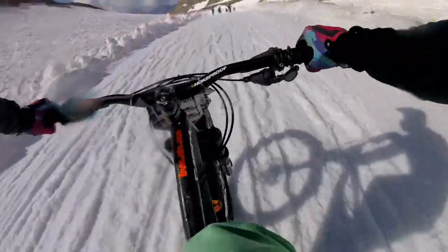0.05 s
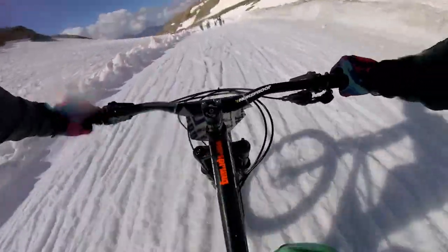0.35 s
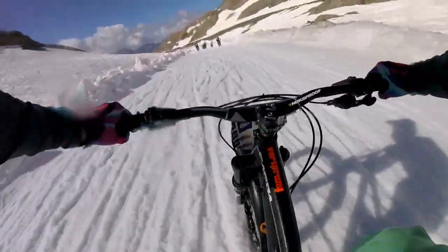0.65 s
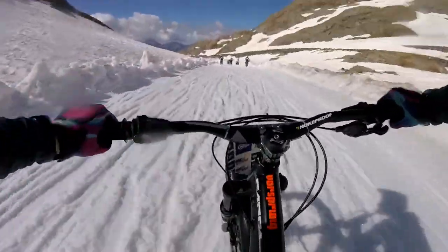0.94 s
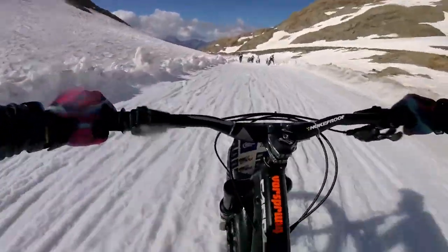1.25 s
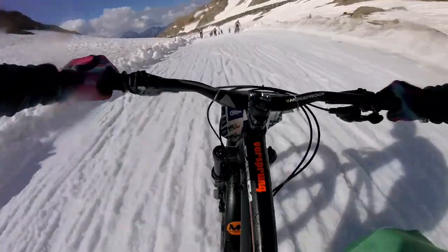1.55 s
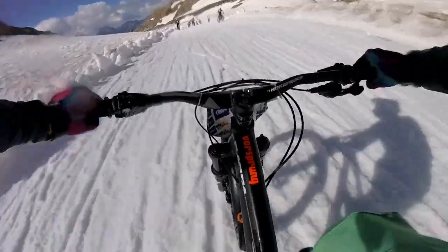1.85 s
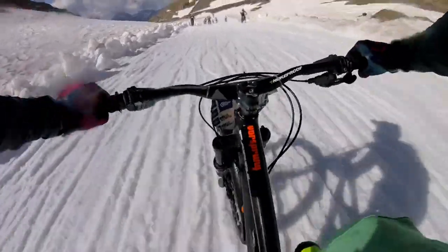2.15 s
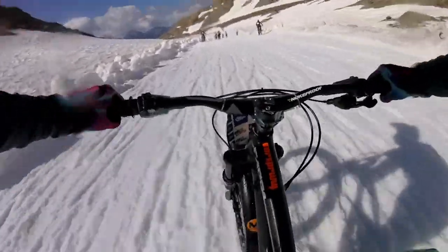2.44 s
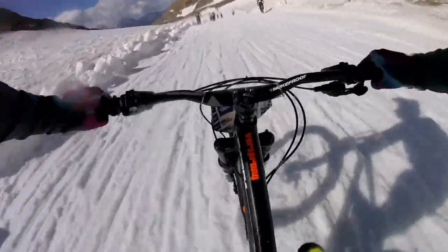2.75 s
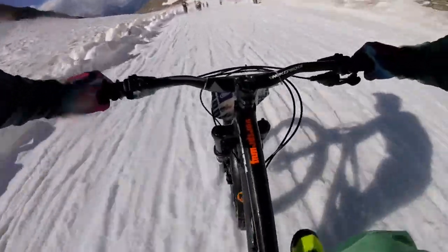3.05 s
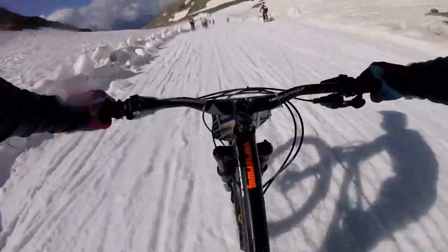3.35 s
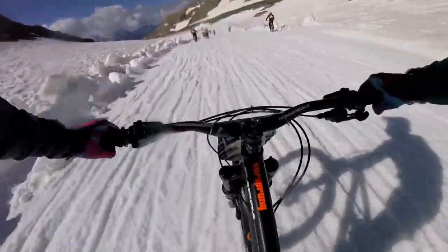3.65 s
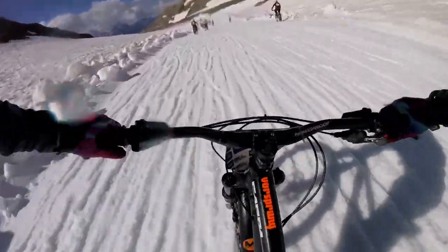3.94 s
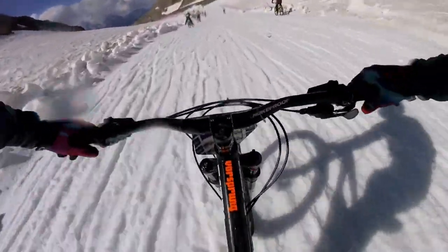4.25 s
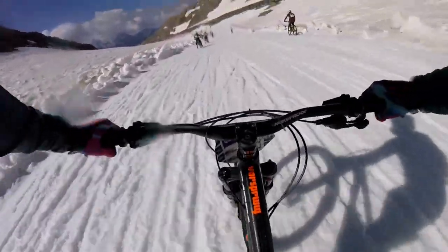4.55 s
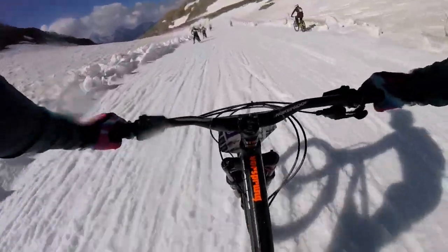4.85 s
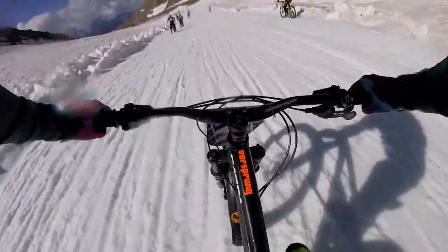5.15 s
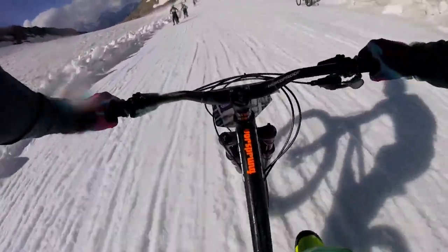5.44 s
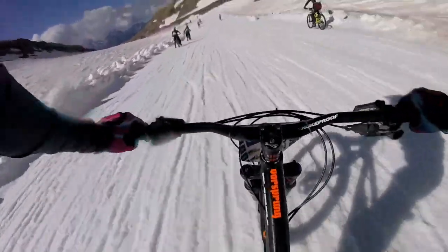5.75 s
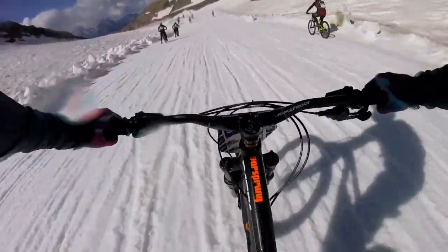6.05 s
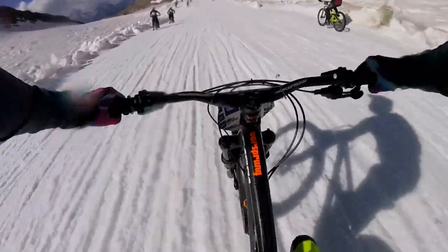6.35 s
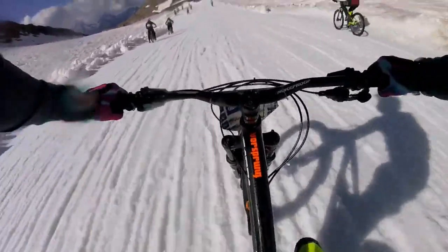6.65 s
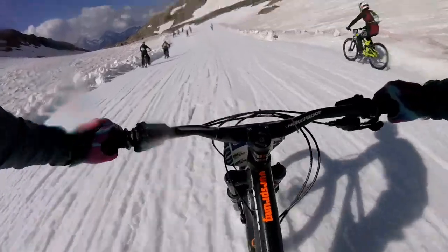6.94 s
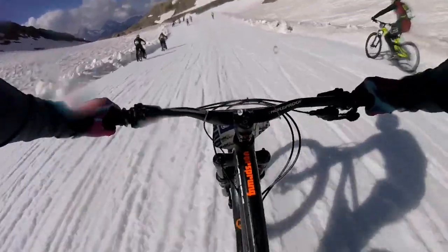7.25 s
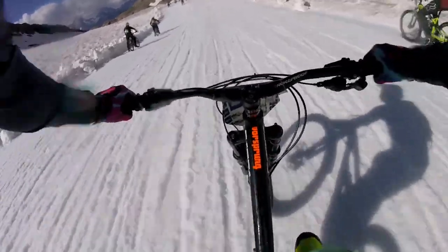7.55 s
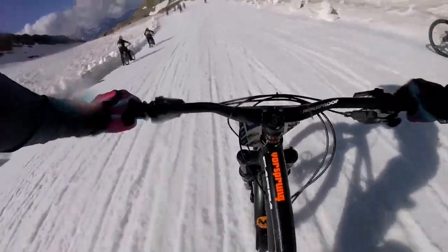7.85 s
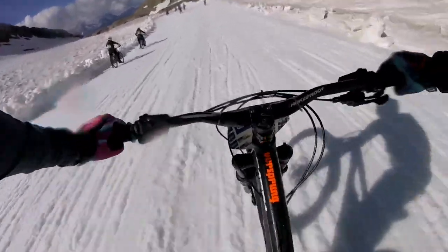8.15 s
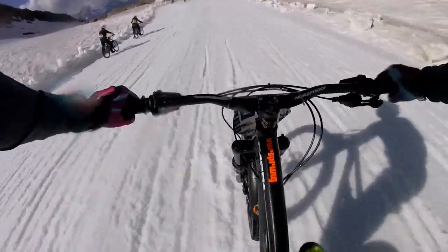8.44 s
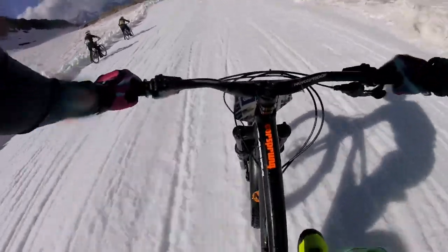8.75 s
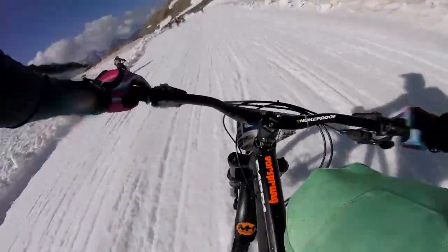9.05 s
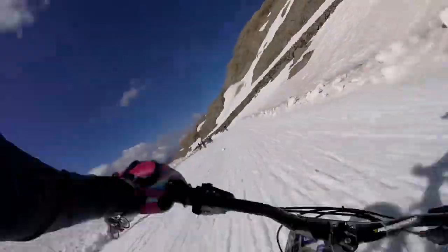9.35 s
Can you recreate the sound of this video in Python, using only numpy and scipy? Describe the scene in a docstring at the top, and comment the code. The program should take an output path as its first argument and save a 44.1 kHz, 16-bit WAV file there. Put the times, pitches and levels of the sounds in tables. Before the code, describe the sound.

A mountain bike runs fast down rutted snow, heard from a microphone on the rider's chest. Low wind rumbles and flutters throughout, breaking into clusters of short knocking buffets, while the tyres hiss and crunch more quietly beneath. After a sharp pop about a third of the way in, the hiss dips briefly. Later a grain of ice ticks, the wind grows to its strongest, and the tyres scrape into a skid.

```python
"""Mountain bike on a snow slope

A fast run down rutted snow, heard from a camera in a plastic case on the rider's chest. Turbulent
wind rumbles on the case, grows with speed and breaks into short knocking buffets. The tyres hiss
through grainy snow, coloured by the resonances of the case. The hiss drops briefly after a sharp
knock; a grain of ice ticks; the tyres skid into a turn."""
import sys
import numpy as np
from scipy import signal
from scipy.fft import rfft, irfft, next_fast_len
from scipy.io import wavfile
from scipy.ndimage import uniform_filter1d

SR = 44100
rng = np.random.default_rng(int(sys.argv[2]) if len(sys.argv) > 2 else 0)


def persist_wave(psi):
    """Save psi, clipped to +-1, as 16-bit WAV."""
    counts = np.round(np.clip(psi, -1, 1) * 32767).astype(np.int16)
    wavfile.write(sys.argv[1], SR, np.atleast_2d(counts).T)


N = 414099
TIME = np.arange(N) / SR


def undb(db):
    """Amplitude ratio of a level in decibels."""
    return 10 ** (np.asarray(db) / 20)


def unit(x):
    """Normalisation to rms 1."""
    return x / np.sqrt(np.mean(x ** 2) + 1e-18)


def curves(table):
    """Linear interpolation in time: one value per sample for each column after the first."""
    times, *columns = np.transpose(table)
    return [np.interp(TIME, times, column) for column in columns]


def bumps(rows):
    out = np.zeros(N)
    for s, height, width in rows:
        a, b = np.searchsorted(TIME, [s - 4 * width, s + 4 * width])
        out[a:b] += height * np.exp(-((TIME[a:b] - s) / width) ** 2)
    return out


def swells(rows):
    return bumps([(s, undb(db), width) for s, db, width in rows])


def colour(x, spectrum, modes=()):
    """Spectral shaping: resonance peaks add in power to a smooth spectrum; the result has rms 1."""
    f = np.arange(len(x) // 2 + 1) * SR / len(x) + 1e-3
    hz, db = np.transpose(spectrum)
    power = undb(np.interp(np.log(f), np.log(hz), db)) ** 2 / (1 + (f / hz[-1]) ** 8)
    for centre, width, mode_db in modes:
        power = power + undb(mode_db) ** 2 / (1 + ((f - centre) / width) ** 2) ** 2
    return unit(irfft(rfft(x) * np.sqrt(power), len(x)))


def noise(spectrum, modes=(), grain_db=0):
    """Coloured noise as a sum of tiny random impacts whose sizes spread by grain_db."""
    n = next_fast_len(N, True)
    impacts = rng.standard_normal(n) * undb(grain_db * np.minimum(rng.exponential(size=n), 7))
    return colour(impacts, spectrum, modes)[:N]


def wander(rate):
    """Smooth random modulation of rms 1, changing about rate times a second."""
    hold = max(int(SR / rate), 2)
    steps = np.repeat(np.clip(rng.standard_normal(N // hold + 1), -2, 2), hold)
    return unit(uniform_filter1d(steps, hold)[:N])


def even(x, seconds):
    """Division by the running rms removes slow swells and keeps quick ones."""
    return x / np.sqrt(uniform_filter1d(x ** 2, int(seconds * SR)) + 1e-9)


def lowpass(x, hz):
    """An elliptic filter cuts steeply above hz."""
    return signal.sosfilt(signal.ellip(10, .2, 80, hz, fs=SR, output="sos"), x)


# strength of the wind on the case: t/s, level/dB
WIND_STRENGTH = [(0.0, -27), (0.33, -29), (0.66, -36), (1.42, -22.5), (1.85, -29.5), (2.2, -27.5),
                 (3.3, -26.5), (3.8, -33), (4.45, -30.5), (4.8, -24.5), (5.2, -30), (5.5, -23), (6.2, -25),
                 (7.33, -22.5), (7.52, -18.5), (8.35, -16), (8.9, -20), (9.39, -23.5)]
# gusts and lulls: t/s, rumble change/dB, flutter change/dB, half-width/s
GUSTS_AND_LULLS = [(0.064, 11, 2, 0.018), (3.258, 2, -0.5, 0.2), (3.444, -5, -2, 0.021),
                   (4.774, -1, 3.5, 0.17), (5.01, -3, -8, 0.029), (7.175, 10, 1, 0.022),
                   (7.573, 4.5, 2.5, 0.09), (7.787, 0, -1, 0.078), (8.036, 3, 1, 0.13),
                   (8.088, -6, 0, 0.0073), (8.237, -6, -16, 0.038), (8.342, 0, 4, 0.28),
                   (8.329, -4.5, -8, 0.011), (8.38, -3.5, 1, 0.013), (8.678, 5, 3.5, 0.057),
                   (8.772, -5, -20, 0.02), (9.196, 11.5, 7, 0.18), (9.343, -13, -16, .02)]

def airflow():
    """Flow noise levels in dB: flutter follows rumble by a power law, and gusts shift both."""
    cruise_db = -25
    strength_db, = curves(WIND_STRENGTH)
    rumble_gusts = bumps([(s, change, width) for s, change, _, width in GUSTS_AND_LULLS])
    flutter_gusts = bumps([(s, change, width) for s, _, change, width in GUSTS_AND_LULLS])
    return strength_db + rumble_gusts, -37.5 + 0.73 * (strength_db - cruise_db) + flutter_gusts


# spectra of slow flow, fast flow, small eddies and separating flow: f/Hz, relative level/dB
SLOW_FLOW_SPECTRUM = [(10, -13.5), (25, -6.5), (42, 1.5), (85, -6.5), (130, -10), (200, -19), (400, -40),
                      (900, -75.5)]
FAST_FLOW_SPECTRUM = [(10, -31), (25, -13), (50, -6.5), (68, -2), (84, -1), (125, -9.5), (200, -19.5),
                      (400, -39), (900, -71)]
FLUTTER_SPECTRUM = [(60, -30.5), (130, -1), (200, 1.5), (330, -3), (500, -10), (800, -21.5), (1400, -32.5),
                    (2200, -49)]
SEPARATION_SPECTRUM = [(200, -25), (450, 6), (900, -10), (1450, 2), (2000, -14), (3000, -36.5)]

def wind(rumble_db, flutter_db):
    """Turbulence: large eddies rumble; at their pressure peaks small ones flutter and the flow tears."""
    force = np.clip((rumble_db + 27) / 13, 0, 1)  # stronger flow sheds its eddies faster
    flow = np.sqrt(1 - force) * noise(SLOW_FLOW_SPECTRUM) + np.sqrt(force) * noise(FAST_FLOW_SPECTRUM)
    rumble = even(flow, 0.13)
    flutter = even(noise(FLUTTER_SPECTRUM) * (1 + .5 * np.abs(rumble)) * undb(wander(70)), 0.15)
    sputter = even(undb(2.2 * wander(28)), 0.17)  # shakes all sizes of eddy together
    crackle_db = 2 * np.minimum(flutter_db + 29, 2) - 43
    crackle = unit(noise(SEPARATION_SPECTRUM) * rumble ** 2) * undb(crackle_db)
    return (rumble * undb(rumble_db) + flutter * undb(flutter_db) + crackle) * sputter


# how hard the tyres work the snow: t/s, crunch level/dB, hiss against crunch/dB
SNOW_LOAD = [(0.0, -42, -1.5), (0.2, -44, -4.5), (0.5, -42, -1), (0.9, -41.3, 0), (1.75, -41, -2),
             (2.45, -43, 1), (2.8, -42, -4.5), (3.4, -42.5, -2.5), (3.85, -46, -1.5), (4.98, -45.5, -2.5),
             (5.12, -43.5, -2), (6.1, -42.5, -2.5), (7.0, -41.5, -1.5), (7.65, -41, -3), (8.66, -43, -2),
             (9.02, -37.5, -1.5), (9.39, -38.5, 0)]
# patches of looser or harder snow: t/s, level change/dB, half-width/s
SNOW_PATCHES = [(.35, 2, 0.063), (1.68, 2.5, 0.024), (1.79, 4, 0.05), (1.92, -1.5, 0.14), (2.15, 3, 0.038),
                (2.64, 3, 0.015), (2.86, 3.3, 0.034), (4.12, 1.5, 0.025), (5.5, -3.5, 0.053),
                (5.68, 3.5, 0.092), (6.57, 2, 0.037), (7.89, 3, 0.15), (8.72, 4.5, 0.023),
                (9.31, -6, 0.013), (9.385, 4.5, 0.015)]
# spectra of the tread and of crushed, thrown and scraped snow: f/Hz, relative level/dB
TREAD_SPECTRUM = [(120, -4), (400, 1), (650, -2.5), (800, -2), (1000, 0), (1270, -7.5), (1700, -23),
                  (3000, -28)]
CRUNCH_SPECTRUM = [(600, -5.5), (1300, -9.5), (1620, -3.5), (2000, -0.5), (2600, -1), (3250, -8.5),
                   (4200, -13.5), (6000, -24.5)]
HISS_SPECTRUM = [(2500, -28.5), (3600, -8.5), (4400, -4.5), (5000, 4), (5600, 0), (6000, -12.5),
                 (6900, 0.5), (7600, -2), (10000, -5), (12000, -50.5)]
SCRAPE_SPECTRUM = [(1300, -16.5), (2100, 3), (2700, -10), (4000, -14.5), (4900, 1), (5400, 3), (6100, -9.5),
                   (10000, -33)]
# treble resonances of the case: f/Hz, half-width/Hz, relative level/dB
CASE_MODES = [(5560, 380, 3.5), (6495, 193, 9)]

def tyres():
    """Rolling noise: the tread roars, its knobs crush, throw and rasp snow; ruts modulate the level."""
    crunch_db, thrown_db = curves(SNOW_LOAD)
    usual_crunch_db = -43
    ruts_db = 0.48 * wander(15) + 0.84 * wander(90)
    roar_db = -42.5 + 0.91 * (crunch_db - usual_crunch_db)
    snow_db = crunch_db + bumps(SNOW_PATCHES)
    hiss_db = snow_db + thrown_db - 1.06
    roar = noise(TREAD_SPECTRUM, grain_db=2.5) * undb(roar_db + 1.43 * wander(10))
    crunch = noise(CRUNCH_SPECTRUM, grain_db=2.5) * undb(snow_db - 0.24 + 0.84 * wander(20))
    hiss = noise(HISS_SPECTRUM, CASE_MODES, grain_db=1) * undb(hiss_db + 1.1 * wander(21))
    rasp = noise(SCRAPE_SPECTRUM, grain_db=4) * undb(snow_db - 8.5 + 1.2 * wander(11))
    return (roar + crunch + hiss + rasp) * undb(ruts_db + dip())


def pressure_front(t, hz, phase):
    """A steep pressure transient: about one cycle under a Gaussian window centred on t = 0."""
    half_width_cycles = 0.44
    return np.exp(-(t * hz / half_width_cycles) ** 2 / 2) * np.sin(2 * np.pi * (hz * t + phase))


# loud buffets: t/s, thud level/dB, nominal thud f/Hz, slap level/dB, half-width/s
LOUD_BUFFETS = [(.073, -23, 130, -50, .006), (.29, -24, 240, -46, 0.0027), (1.442, -15, 230, -42, 0.0053),
                (3.131, -15.5, 225, -52, 0.0025), (3.139, -19, 215, -54, .007),
                (3.207, -16.5, 202, -34, 0.0035), (3.255, -25.5, 302, -35.5, .0035),
                (3.289, -10, 223, -32, 0.0047), (3.462, -19, 300, -30.5, 0.0037),
                (3.4693, -11.5, 277, -34, 0.0023), (3.4878, -11.5, 290, -30, 0.0021),
                (3.492, -17, 380, -29.5, .0022), (3.499, -31, 360, -42, .003),
                (3.517, -23, 305, -34, 0.0046), (3.638, -25, 343, -42, .0043), (4.615, -24, 346, -41, .005),
                (4.628, -21.5, 231, -30, 0.0039), (4.651, -13, 290, -33, 0.0055),
                (4.666, -16.5, 307, -43, .004), (4.771, -18, 308, -35, .0028),
                (4.807, -17.5, 297, -31, .0024), (4.815, -28, 302, -31, .0028),
                (4.828, -22, 270, -29, .003), (4.835, -22, 288, -24.5, .0028),
                (4.861, -17, 284, -37, 0.0032), (4.870, -18.5, 310, -32.5, 0.0029),
                (4.939, -19, 290, -36, .0035), (4.949, -22, 278, -32, 0.0036), (5.02, -30, 261, -35, .004),
                (5.0715, -14.5, 290, -34, 0.0044), (5.08, -20, 290, -37, .0035),
                (5.114, -23.5, 259, -43, .003), (5.447, -14, 242, -35, .004), (5.459, -31, 270, -37, .003),
                (5.497, -13, 240, -36, 0.005), (5.658, -17.5, 335, -41, 0.0071),
                (5.931, -30, 359, -41, 0.0049), (6.003, -15, 310, -30.5, 0.0045),
                (6.012, -17.5, 440, -33, .0038), (6.0765, -16.5, 420, -33, 0.0047),
                (6.5427, -20.5, 327, -38, .003), (6.607, -20.5, 212, -56, 0.012),
                (6.653, -15.5, 374, -32, .004), (7.176, -14, 190, -32.5, .006),
                (7.326, -21.5, 264, -51, .0088), (7.856, -25, 319, -31, 0.0027),
                (7.998, -14.5, 229, -36, .0065), (8.0666, -12.5, 203, -28, 0.0042),
                (8.1465, -10, 235, -24, 0.0046), (8.174, -10, 220, -27, 0.0028),
                (8.2, -27, 200, -28.5, 0.0022), (8.243, -16.5, 440, -31, 0.0042),
                (8.2818, -8, 260, -21, 0.0038), (8.3013, -27, 296, -31, .0015),
                (8.317, -16.5, 310, -30, 0.0066), (8.336, -31, 295, -31, 0.0022),
                (8.3505, -10, 278, -22.5, 0.0043), (8.371, -22, 260, -31, .0037),
                (8.4007, -11.5, 329, -37, .0025), (8.415, -15, 340, -40, .0065),
                (8.428, -22, 238, -28, .0042), (8.447, -14, 243, -30, 0.0054),
                (8.472, -12.5, 190, -42, 0.0027), (8.549, -25, 297, -29, 0.0049),
                (8.577, -17, 265, -35, 0.0056), (8.636, -17, 262, -43, .0076),
                (8.704, -23, 223, -29.5, 0.014), (8.821, -23.5, 203, -38, 0.0068),
                (9.137, -18, 205, -29.5, 0.0087), (9.364, -14.5, 255, -29, 0.0047)]
# spectrum of a buffet's slap: f/Hz, relative level/dB
SLAP_SPECTRUM = [(250, -13), (450, 9), (850, 2), (1400, -2.5), (1850, -16.5), (2800, -41.5)]

def buffets(rows):
    """Eddy impact: uneven pressure swings peak in the spike of the core, with a slap at their height."""
    size, core_cycles, usual_slap_db = 4096, 0.33, -30
    out, t = np.zeros(N + 2 * size), (np.arange(size) - size // 2) / SR
    skewed = np.where(t < 0, t / 0.71, t / 1.04)  # it breaks faster than it dies away
    for s, thud_db, hz, slap_db, width in rows:
        swell = np.exp(-(skewed / width) ** 2 / 2)
        # the swings are quickest where the flow is most violent
        unrest = colour(rng.standard_normal(size), [(50, -1.5), (300, -1.5), (600, -22.5)])
        cycles = np.cumsum(hz * (0.3 + 0.56 * swell) * np.exp(0.5 * np.tanh(unrest))) / SR
        phase = rng.random()  # swings, core and front push the same way
        swing = np.sin(2 * np.pi * (cycles - cycles[size // 2] + phase))
        core = np.imag(np.exp(2j * np.pi * phase) / (1 - 1j * t * hz / core_cycles) ** 2)
        thud = undb(-1.7) * (swell * swing + core * np.hanning(size))
        # the slap spurts at the tops of the swings
        crest = np.exp(-(skewed / (width * 0.94)) ** 2 / 2)
        spurts = colour(rng.standard_normal(size) * crest * swing ** 2, SLAP_SPECTRUM)
        spurts *= np.sqrt(np.mean(crest ** 2))
        front_hz = 780 * 2 ** (0.14 * (slap_db - usual_slap_db))  # harder slaps have steeper fronts
        slap = undb(-1) * spurts + undb(3.5) * pressure_front(t, front_hz, phase)
        start = int(s * SR) + size // 2
        out[start:start + size] += thud * undb(thud_db) + slap * undb(slap_db)
    return out[size:size + N]


def shoves():
    """Low-frequency pressure pulses: each loud buffet sits in a broader push of air."""
    against_thud_db, half_width_s = -5, 0.0089
    push = swells([(s, thud_db + against_thud_db, half_width_s) for s, thud_db, *_ in LOUD_BUFFETS])
    return push * even(noise([(30, -15.5), (70, -7), (110, -5.5), (160, -8.5), (300, -22)]), 0.04)


def eddies(flutter_db):
    """Intermittency: small buffets strike at random times, their strength following the flutter."""
    per_second, usual_hz, usual_width_s = 8, 310, 0.0051
    rows = []
    for when, size, pitch, span in rng.random((int(per_second * N / SR), 4)):
        thud_db = flutter_db[int(when * N)] + 6 + 5.5 * (2 * size - 1)
        hz = usual_hz * 2 ** (pitch - .5)
        rows.append((when * N / SR, thud_db, hz, thud_db - 14.5, usual_width_s * (.5 + span)))
    return buffets(rows)


# sideways slips of the tyres: t/s, level/dB, half-width/s
SIDE_SLIPS = [(.55, -54, 0.13), (1.66, -54, .03), (2.645, -41, .018), (5.1, -47, .025),
              (5.28, -45.5, 0.092), (8.8, -48.5, 0.097), (8.965, -36, 0.086), (9.14, -40.5, 0.083)]

def skids():
    """Sliding friction: the knobs shave the snow with a juddering rasp and fling coarse grit."""
    grains_per_s = 330
    rasp = noise(SCRAPE_SPECTRUM, grain_db=2) * undb(1.2 * wander(110))
    grains = (rng.random(N) < grains_per_s / SR) * undb(-rng.standard_normal(N))
    grit_spectrum = [(1200, -22), (2150, 6), (3800, -9), (5300, 1), (7200, -3), (10000, -8)]
    grit = colour(grains, grit_spectrum, CASE_MODES)
    return swells(SIDE_SLIPS) * (rasp + undb(-9) * grit)


# fans of fine snow: t/s, level/dB, half-width/s
SPRAY_FANS = [(.87, -41.5, 0.075), (1.38, -37.5, 0.078), (7.9, -45, 0.15), (9.376, -34.5, 0.0072)]

def spray():
    """Forced vibration: fine snow sweeps over the case and excites its sharpest resonance."""
    spectrum = [(5800, -28), (6550, 0), (7100, -10), (7800, -13.5), (10000, -26)]
    return swells(SPRAY_FANS) * noise(spectrum, grain_db=1)


# sharp pops of air: t/s, envelope peak level/dB, f/Hz
AIR_POPS = [(3.0667, -22, 744), (3.393, -10, 830), (8.3452, -19, 1090), (8.698, -24, 1000)]

def pops():
    """Impulsive sound: short, sharp pops of air hit the case, some alone, some amid the buffets."""
    out, t = np.zeros(N), np.arange(-(SR // 100), SR // 100) / SR
    for s, db, hz in AIR_POPS:
        start = int((s + t[0]) * SR)
        out[start:start + len(t)] += undb(db) * pressure_front(t, hz, rng.random())
    return out


def dip():
    """Brief attenuation in dB: the tyre noise drops just after the loudest pop, then recovers."""
    start_s, fall_s, hold_s, recover_s = 3.405, 0.011, 0.12, 0.33
    corners = start_s + np.cumsum([0, fall_s, hold_s, recover_s])
    return np.interp(TIME, corners, [0, -6, -6, 0])


# ice striking the case: t/s, level/dB
ICE_STRIKES = [(6.7712, -27), (6.7726, -22)]

def ice_ticks():
    """Damped free vibration: a grain of ice hits with a crack and leaves the case ringing briefly."""
    ring_hz, ring_decay_s = CASE_MODES[-1][0], .0013
    crack_hz, crack_decay_s = 8700, .00016
    out, t = np.zeros(N), np.arange(SR // 50) / SR
    ring = np.sin(2 * np.pi * ring_hz * t) * np.exp(-t / ring_decay_s)
    crack = undb(-.5) * np.cos(2 * np.pi * crack_hz * t) * np.exp(-t / crack_decay_s)
    for s, db in ICE_STRIKES:
        start = int(s * SR)
        out[start:start + len(t)] += undb(db) * (ring + crack)
    return out


def scene():
    """Superposition: wind, snow and case add at one microphone."""
    rumble_db, flutter_db = airflow()
    air = wind(rumble_db, flutter_db) + buffets(LOUD_BUFFETS) + shoves() + pops()
    snow = lowpass(tyres() + skids() + spray(), hz=10450)
    return (air + snow + ice_ticks() + eddies(flutter_db))[None]


def record(dry):
    """Saturation and band limiting: the camera rounds the biggest pressure swings and cuts the top."""
    ceiling = 1.6
    return lowpass(ceiling * np.tanh(dry / ceiling), hz=14200)


dry = scene()
out = record(dry)
persist_wave(out)
```